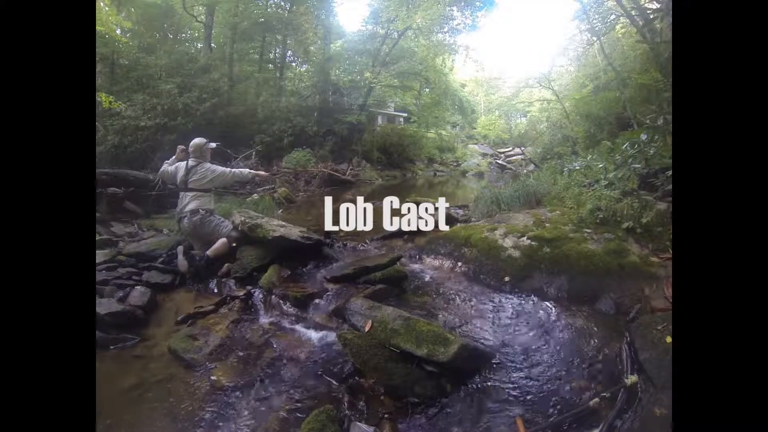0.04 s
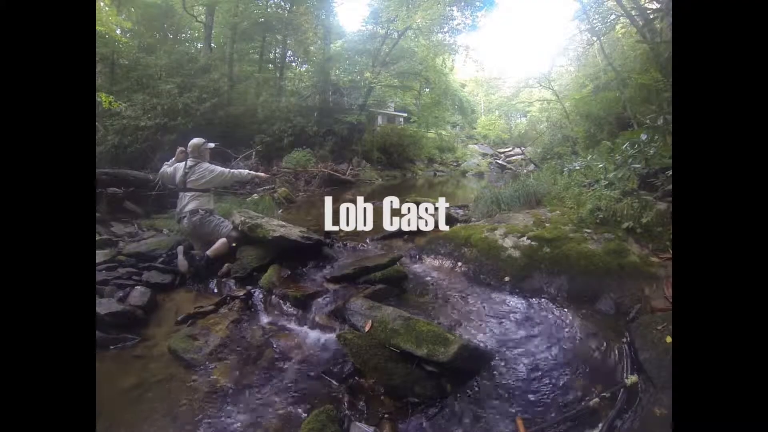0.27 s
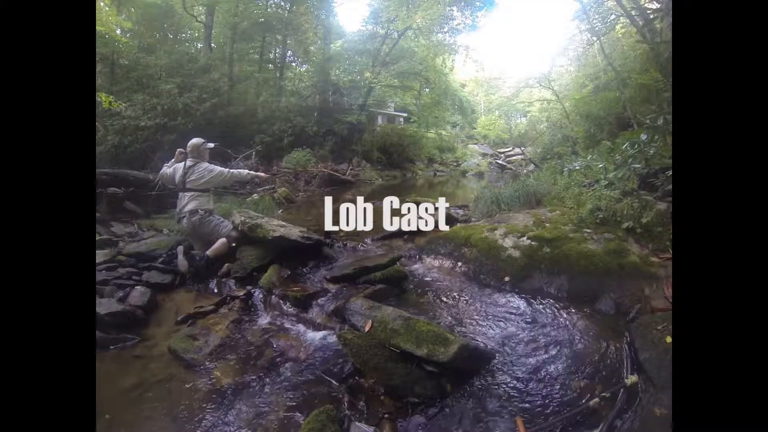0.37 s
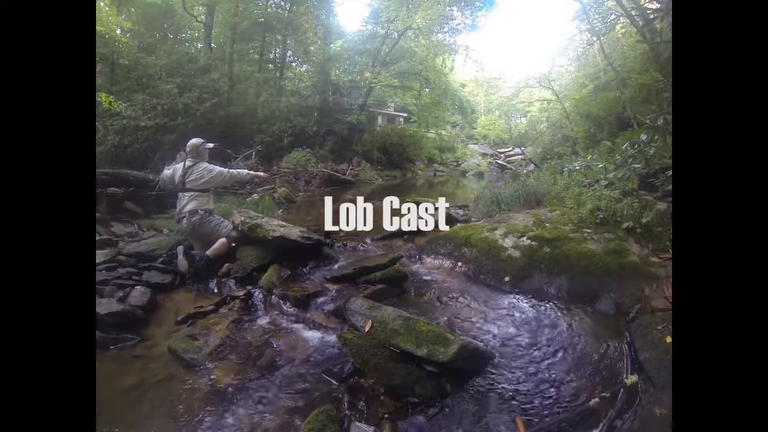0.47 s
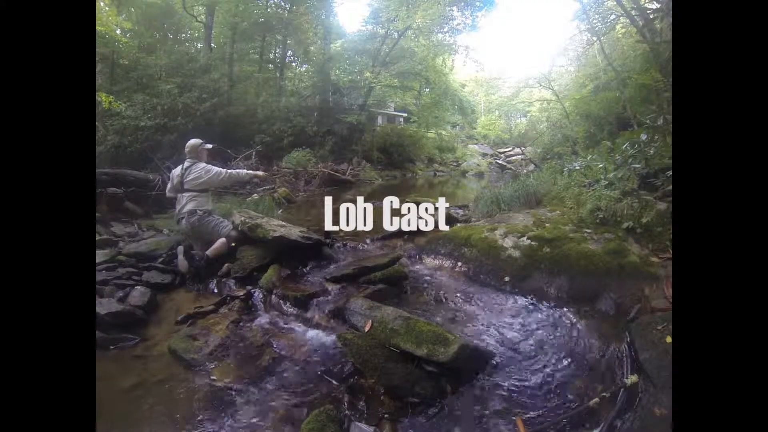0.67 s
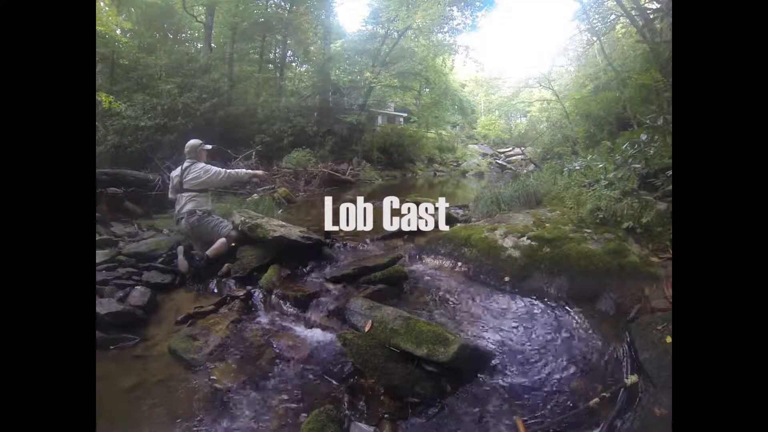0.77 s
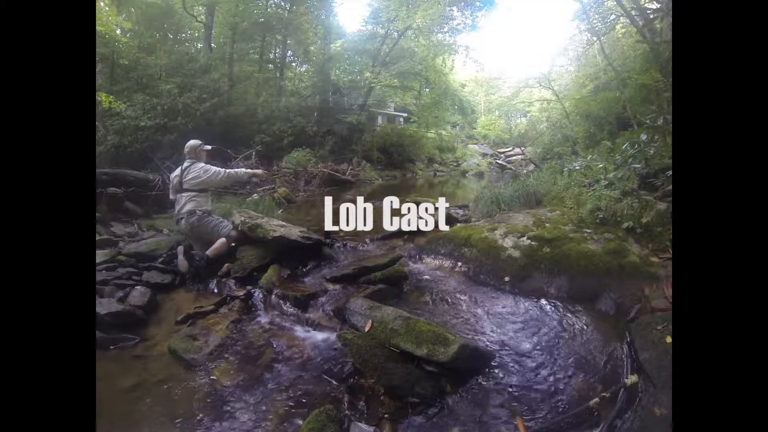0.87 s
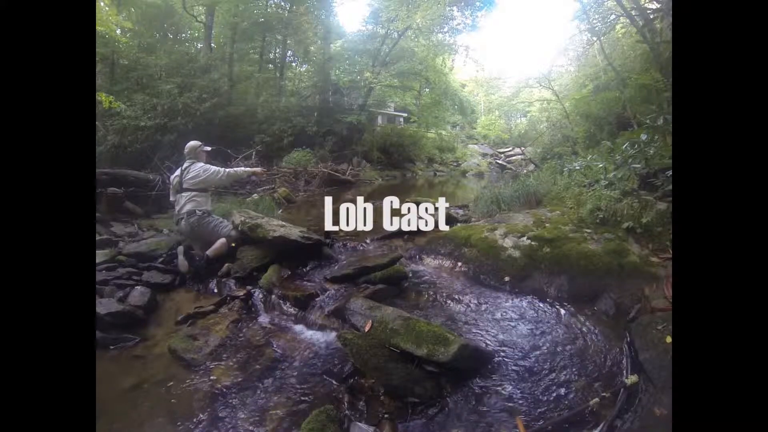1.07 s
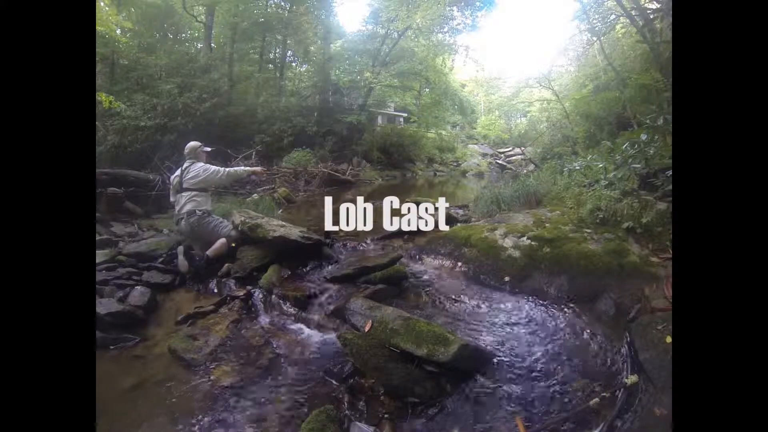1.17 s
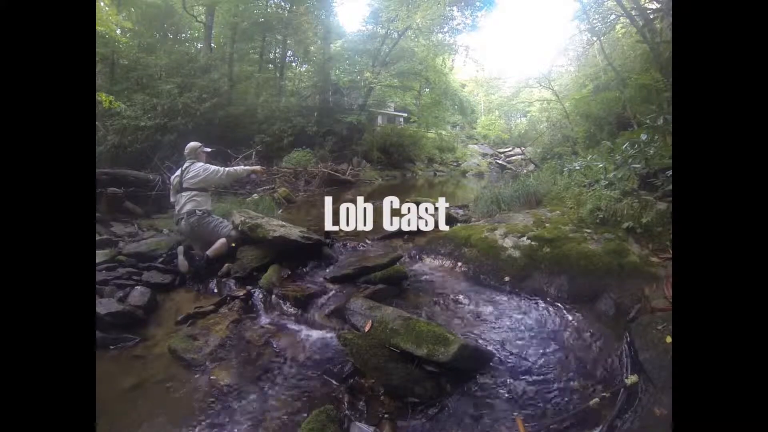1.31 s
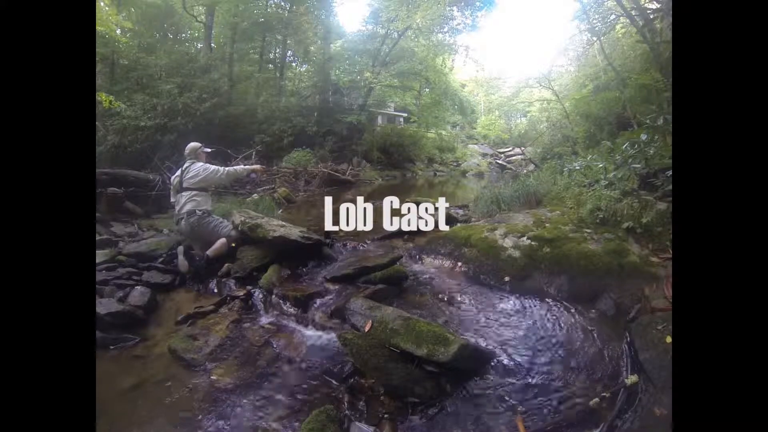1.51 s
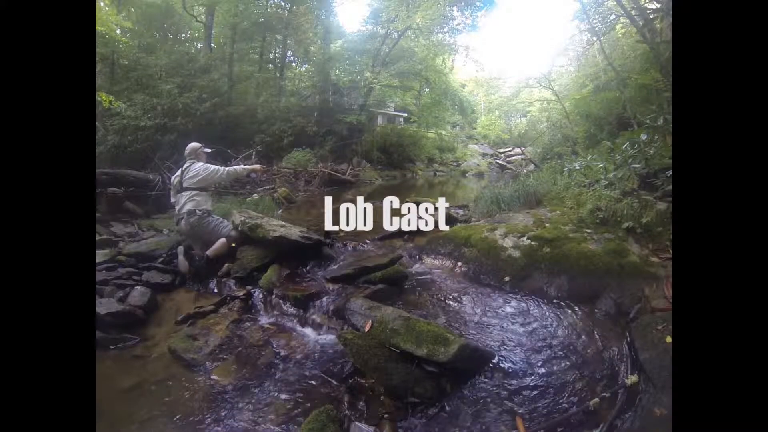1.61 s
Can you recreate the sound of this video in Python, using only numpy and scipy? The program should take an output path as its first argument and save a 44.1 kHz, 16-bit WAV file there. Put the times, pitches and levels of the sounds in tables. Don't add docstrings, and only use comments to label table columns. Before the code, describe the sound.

Water plopping and gurgling in a small rocky stream, heard muffled through a camera's plastic shell

```python
import sys
import numpy as np
from scipy import signal
from scipy.fft import rfft, irfft
from scipy.io import wavfile
from scipy.ndimage import uniform_filter1d

SR = 44100
rng = np.random.default_rng(int(sys.argv[2]) if len(sys.argv) > 2 else 0)


def to_wav(sig):
    pcm = np.clip(np.atleast_2d(sig), -1, 1) * 32767
    pcm = np.round(pcm).astype(np.int16)
    wavfile.write(sys.argv[1], SR, pcm.T)


def field_ratio(decibels):
    return 10 ** (np.asarray(decibels, dtype=float) / 20)


N = 72765

# (centre [Hz], width [Hz], level [dB])
HUM_BANDS = [(61.5, 30, -53.5), (105.3, 20, -52.5), (145, 24, -54.5), (189.5, 6.5, -53.5)]
# (frequency [Hz], level [dB per Hz])
RUMBLE_SPECTRUM = [(20, -13), (45, -30), (60, 1), (200, -1), (300, -21.5), (600, -9)]
# (frequency [Hz], level [dB per Hz])
HISS_SPECTRUM = [(1200, -56), (2000, -2.5), (2800, -4), (5700, -20), (8000, -20), (11000, -27.5),
                 (13300, -24), (13700, -28.5), (13900, -61)]
WHINE_SLIPS = np.array([0, .0003, .0004, -.0001])
# (time [s], level [dB])
FLOW = [
    (0.0, -34.5),
    (0.316, -39),
    (1.65, -36.5),
]
# (frequency [Hz], level [dB], time to fall 60 dB [s])
HOUSING_MODES = [(321.5, 5, 0.0342), (507, -4.5, 0.0092), (629, 7, 0.017), (993.5, -3, 0.058),
                 (1270, 5.5, 0.015), (1350, 9, 0.014), (1523, 8, 0.0088), (1683, 3, 0.009),
                 (1973.5, 3.5, 0.0077), (2900, -18, 0.017), (3290, -21.5, 0.025), (3650, -16, 0.021),
                 (4240, -10, 0.012), (4800, -22.5, 0.012)]
MODE_SIGNS = [-1, -1, 1, 1, -1, 1, -1, 1, 1, 1, 1, 1, 1, 1]
# (time [s], peak [dB])
FILM_SNAPS = [(.0405, -50), (0.1227, -47.5), (0.241, -42.5), (.5400, -47), (.5490, -47), (0.792, -50),
              (0.813, -40), (0.877, -46), (1.069, -47), (1.188, -47), (1.2640, -48), (1.273, -40),
              (1.276, -45), (1.2998, -38), (1.473, -43)]
# (time [s], peak [dB], pitch [Hz])
SPRAY_TICKS = [
    (.1228, -51, 10400),
    (0.239, -51, 7440),
    (.2400, -45, 10150),
    (.8140, -50.5, 10600),
    (.963, -55, 9800),
    (1.2640, -59, 9800),
    (1.3016, -39, 6660),
    (1.3867, -54, 9600),
    (1.4105, -48, 6200),
    (1.47, -50, 6900),
]
# (time [s], peak [dB], pitch [Hz])
PLINKS = [
    (.010, -42.5, 2670),
    (.185, -49, 5140),
    (0.533, -52, 5200),
    (.795, -50, 4700),
    (1.068, -48, 4840),
    (1.186, -48, 5140),
]
# (time [s], peak
# [dB], pitch [Hz], length [cycles])
PLOPS = [(.0189, -24, 1370, 1.26), (.1719, -18.5, 1420, 2.94), (.2315, -2.5, 1590, 8.9),
         (.2837, -6.5, 1590, 2.9), (.3396, -18, 1460, 1), (.3941, -25.5, 1500, 2.9),
         (.6540, -24, 1380, 3.8), (.7415, -22.5, 1500, 1.1), (.8148, -21.5, 1235, 3.7),
         (.8529, -22, 1390, 1), (.9652, -18, 1330, 1.1), (.9976, -23.5, 1380, 1.7), (1.2222, -26, 1350, 12),
         (1.2297, -19, 1470, 1.72), (1.2647, -19, 1390, 1.96), (1.3021, -20, 1425, 2.2),
         (1.3444, -27.5, 1470, 6.3), (1.3879, -10.5, 1404, 4.3), (1.4392, -18, 1396, 3.6),
         (0.0758, -31, 1350, 2.8), (0.1253, -30, 1330, 1.4), (.1410, -34, 1500, 2.7),
               (0.3599, -24.5, 1400, 1.3), (0.54, -31, 1260, 4), (0.5825, -30, 1560, 9),
               (0.7016, -31, 1180, 0.96), (0.715, -37, 1300, 3.1), (0.8073, -26, 1370, 4.2),
               (0.8794, -28.5, 1360, 1.3), (0.9134, -30.5, 1460, 3.5), (0.9454, -35, 1270, 1.4),
               (1.0506, -30.5, 1360, 0.81), (1.1048, -24, 1390, 1), (1.188, -30, 1350, 2.5),
               (1.273, -31.5, 1450, 4.1), (1.4108, -42, 1370, 3.3), (1.4761, -31.5, 1410, 5.4),
               (1.5517, -29.5, 1270, 3.16),
         (.2345, -15, 1660, 3), (.2380, -19, 1670, 3), (.2442, -24, 1360, 2),
                    (.2800, -24, 1450, 5), (.2857, -13, 1880, 3.5), (.2880, -25, 1350, 14),
                    (.2888, -14, 1910, 6), (.2890, -29, 990, 12), (.2925, -20, 1800, 4),
                    (1.056, -37, 1950, 9.0), (1.100, -35.5, 1980, 27), (1.3785, -22, 1450, 4.0),
                    (1.6021, -23.5, 1215, 24)]
# (time [s], peak [dB], pitch [Hz], length [cycles])
TINKS = [(.1235, -49, 3620, 4.5), (0.1724, -29, 2900, 6.8), (0.241, -42, 3330, 4.4),
         (0.3391, -27, 3290, 13), (0.4187, -46.5, 4250, 14), (.5530, -35.5, 3370, 4.7),
         (0.6543, -42, 2900, 20.5), (0.715, -39, 3680, 7.4), (0.7398, -29.5, 3250, 2.9),
         (0.814, -31.5, 3800, 1.8), (0.852, -25, 3120, 25), (0.9128, -38, 4240, 6),
         (0.9639, -22, 3410, 8.6), (1.068, -44.5, 3650, 4.1), (1.2226, -28.5, 3970, 7.5),
         (1.2297, -25.5, 4480, 3.8), (1.2310, -37, 3720, 8), (1.2646, -26, 3060, 1.2),
         (1.2717, -41, 4070, 3), (1.3008, -35.5, 3600, 3.7), (1.3784, -28, 2480, 6.4),
         (1.3869, -19, 2900, 11.8), (1.4396, -22.5, 2900, 7.6), (1.4730, -42, 3200, 3.5),
         (1.6201, -35.5, 4270, 4.4), (1.6200, -38, 2680, 14), (1.6195, -49, 3650, 8),
         (1.1053, -40.5, 3200, 4), (1.3440, -38, 2730, 6), (1.4360, -45, 4240, 13), (0.148, -45, 2490, 6.8),
         (0.323, -41, 2570, 8.8), (1.2330, -31, 4880, 10.2), (0.968, -39, 3350, 10)]
# (time [s], peak [dB], pitch [Hz], length [cycles])
GLUGS = [(.0226, -40, 550, 2.7), (.2500, -38.5, 504, 2), (0.243, -31, 420, 6.1), (0.2852, -37, 554, 1.4),
         (.3405, -40.5, 450, 2.4), (.5830, -33, 490, 1.5), (.6583, -35, 567, 5.3), (.8153, -33, 414, 3),
         (0.9661, -45, 513, 1.2), (1.233, -38, 526, 2.3), (1.3890, -30.5, 620, 3.9),
         (1.4396, -31.5, 430, 0.88)]
# (time [s], peak [dB], pitch [Hz])
DRIBBLES = [(.0078, -32.5, 1530), (0.0413, -35, 1300), (0.042, -29, 2140), (0.088, -37, 1400),
            (0.1854, -37, 1510), (0.1904, -33, 1270), (0.3456, -25, 1280), (0.4181, -34, 1450),
            (0.5319, -36, 1510), (0.5507, -29, 1350), (0.586, -34, 2000), (0.7053, -31, 1440),
            (0.718, -30, 1210), (0.773, -33, 1310), (0.794, -43, 1360), (0.9572, -32, 1400),
            (0.973, -40, 1160), (0.9818, -35, 1350), (1.024, -32, 1490), (1.0392, -34, 1450),
            (1.0698, -34.5, 1110), (1.169, -42, 1310), (1.235, -28, 1300), (1.279, -25, 1350),
            (1.458, -43, 1420), (1.498, -37, 1400), (1.5073, -41, 1500), (1.5546, -33, 1210),
            (1.6190, -28.5, 1230), (1.6378, -33.5, 1400), (0.457, -51, 1510), (.4800, -45, 1400),
            (0.57, -42, 1450), (0.619, -48, 1310), (1.539, -43, 1480), (1.5450, -43, 1700)]

PITCH_GLIDE = 0.03
FLICKER_DB, FLICKER_PER_S = 1.5, 150


def level(x, db):
    return x * field_ratio(db) / np.sqrt(np.mean(x ** 2))


def peak(x, db=0):
    return x * field_ratio(db) / np.abs(x).max()


def add(out, s, grain):
    i = max(int(s * SR), 0)
    out[i:i + len(grain)] += grain[:max(N - i, 0)]


def colour(points):
    hz, db = np.array(points).T
    f = np.maximum(np.arange(N // 2 + 1) * SR / N, 1)
    curve = np.interp(np.log(f), np.log(hz), db, -90, -90)
    return irfft(rfft(rng.standard_normal(N)) * field_ratio(curve), N)


def walk(rate):
    k = int(SR / rate)
    w = uniform_filter1d(uniform_filter1d(rng.standard_normal(N), k), k)
    return (w - w.mean()) / w.std()


def bubble(hz, cycles, rise=1.1, glide=PITCH_GLIDE):
    turns = np.arange(int((2 * cycles + 2 * rise) * SR / hz) + 2) * hz / SR
    swell = (1 - np.exp(-turns / rise)) ** 2
    fall = np.exp(-2.5 * turns / cycles) * (1 - turns / turns[-1])
    return swell * fall * np.sin(2 * np.pi * turns * (1 + glide * turns / cycles))


def housing():
    t = np.arange(4096) / SR
    ringing = np.zeros(len(t))
    for (hz, db, t60), sign in zip(HOUSING_MODES, MODE_SIGNS):
        ringing += sign * field_ratio(db) * np.sin(2 * np.pi * hz * t) * np.exp(-np.log(1000) * t / t60)
    cepstrum = irfft(np.log(np.abs(rfft(ringing, 16384)) + 1e-3))
    cepstrum[1:8192] *= 2
    cepstrum[8193:] = 0
    return irfft(np.exp(rfft(cepstrum)))[:4096]


def hum():
    f = np.arange(N // 2 + 1) * SR / N
    out = np.zeros(N)
    for hz, width, db in HUM_BANDS:
        resonance = 1 / (1 + (2 * (f - hz) / width) ** 2)
        out += level(irfft(rfft(rng.standard_normal(N)) * resonance, N), db)
    return out


def rumble():
    return level(colour(RUMBLE_SPECTRUM), -50)


def hiss():
    flicker = field_ratio(FLICKER_DB * walk(FLICKER_PER_S))
    return level(colour(HISS_SPECTRUM) * flicker, -58.5)


def top_noise():
    out = np.zeros(N)
    for low, high in [(13700, 14100), (14000, 14500), (14300, 14900)]:
        band = level(colour([(low, 0), (high, 0)]), -83)
        out += band * np.clip(3 * (walk(40) - 0.9), 0, 1)
    return out


def whine():
    rate, start_s = 47.945, 0.0175
    tone_hz, on_s, edge_s = 6444, 0.0079, 0.00046
    turns = (np.arange(N) / SR - start_s) * rate + 4
    k = turns.astype(int)
    tau = (turns - k) / rate
    on = tau - np.array(WHINE_SLIPS)[k % 4]
    gate = np.clip(np.minimum(on, on_s - on) / edge_s + 0.5, 0, 1)
    phase = 2 * np.pi * tone_hz * tau + 1.15 * rng.standard_normal(N // 500)[k]
    tone = field_ratio(-56) * np.sin(phase)
    overtone = field_ratio(-62.5) * (-1) ** k * np.sin(2 * phase)
    tick_shape = np.exp(-(on / 0.00044) ** 2) + np.exp(-((on - on_s) / 0.0008) ** 2)
    tick_phase = 3 * phase[k * 400]
    ticks = field_ratio(-64) * tick_shape * np.sin(2 * np.pi * 7870 * tau + tick_phase)
    return gate * (tone + overtone) + ticks


def gurgle(shell):
    per_s, centre_hz, octaves = 750, 1350, 0.65
    spread_db, size_cap = 4.6, 2.3
    bubbles = np.zeros(N)
    for when, pitch, size in rng.random((int(per_s * N / SR), 3)):
        hz = centre_hz * 2 ** (octaves * np.log(pitch / (1 - pitch)) / 2)
        strength = field_ratio(spread_db * min(-np.log(size), size_cap))
        strength *= min(hz / centre_hz, 1)
        add(bubbles, when * N / SR, strength * bubble(np.clip(hz, 320, 6000), 1.7))
    wash = rng.standard_normal(N) * field_ratio(2 * FLICKER_DB * walk(FLICKER_PER_S))
    bubbles = level(signal.fftconvolve(bubbles, shell)[:N], -50)
    wash = level(signal.fftconvolve(wash, shell)[:N], -55)
    flow = np.interp(np.arange(N) / SR, *np.array(FLOW).T)
    return field_ratio(flow - flow.mean()) * (bubbles + wash)


def snaps():
    out, t = np.zeros(N), np.arange(400) / SR
    snap_s = 0.0009
    band = signal.butter(1, [2880, 6000], "band", fs=SR, output="sos")
    for (s, db), noise in zip(FILM_SNAPS, rng.standard_normal((len(FILM_SNAPS), len(t)))):
        burst = signal.sosfilt(band, noise) * t * np.exp(-t / snap_s)
        add(out, s - snap_s, peak(signal.sosfilt(band, burst), db))
    return out


def spray():
    out = np.zeros(N)
    for s, db, hz in SPRAY_TICKS:
        add(out, s - 0.0005, peak(bubble(hz, 22.0), db))
    for s, db, hz in PLINKS:
        add(out, s - 0.001, peak(bubble(hz, 20.0), db))
    add(out, 0.236, peak(bubble(62, 2.6), -35.5))
    return out


def splashes(shell):
    splash_s, splash_db = 0.0049, -19
    spray_s, spray_db, spray_hz = 0.0011, -36, 3370
    out, t = np.zeros(N), np.arange(2048) / SR
    dribbles = [(*row, 2.2) for row in DRIBBLES]
    rows = [*PLOPS, *TINKS, *GLUGS, *dribbles]
    bright = signal.butter(2, [spray_hz, 3 * spray_hz], "band", fs=SR, output="sos")
    for (s, db, hz, cycles), noise in zip(rows, rng.standard_normal((len(rows), 2, len(t)))):
        rise, glide = (1.7, -0.034) if hz > 2200 else (1.5, PITCH_GLIDE)
        direct = peak(bubble(hz, max(cycles, 1.6), rise, glide))
        ring = peak(signal.fftconvolve(direct, shell))
        add(ring, 0, 0.5 * direct)
        ragged = signal.fftconvolve(noise[0] * t * np.exp(-t / splash_s), bubble(hz, 0.85))
        splash = peak(signal.fftconvolve(ragged, shell), splash_db)
        add(ring, 0, splash[:len(ring)])
        s -= np.abs(ring).argmax() / SR
        add(out, s, peak(ring, db))
        if db < -14:
            droplets = signal.sosfilt(bright, noise[1] * t * np.exp(-t / spray_s))
            add(out, s, peak(droplets, db + spray_db))
    return out


def scene():
    shell = housing()
    background = hum() + rumble() + hiss() + top_noise() + whine()
    water = gurgle(shell) + snaps() + spray() + splashes(shell)
    return (background + water)[None]


def band_limit(x):
    return signal.sosfilt(signal.butter(12, 14960, fs=SR, output="sos"), x)


def record(dry):
    dull = signal.sosfilt(signal.butter(6, 13700, fs=SR, output="sos"), dry)
    return band_limit(dull)


dry = scene()
out = record(dry)
to_wav(out)
```